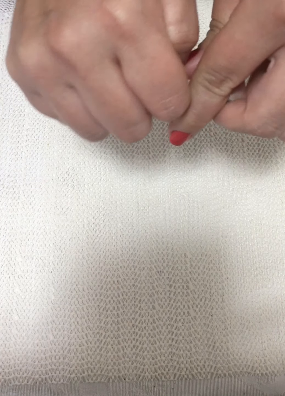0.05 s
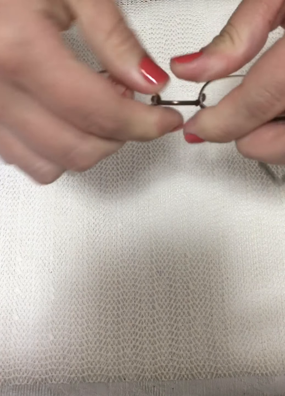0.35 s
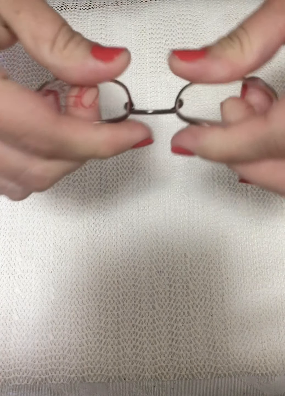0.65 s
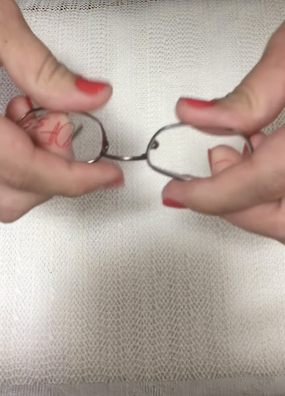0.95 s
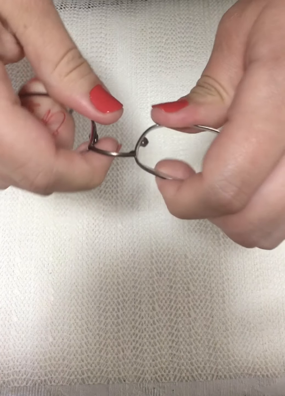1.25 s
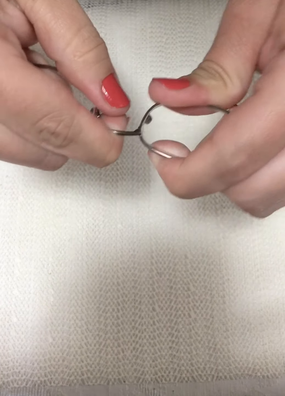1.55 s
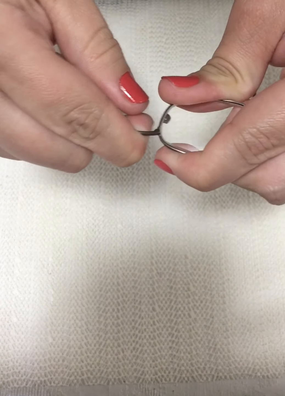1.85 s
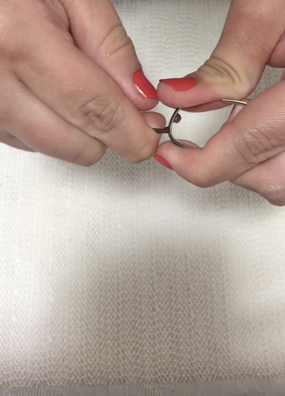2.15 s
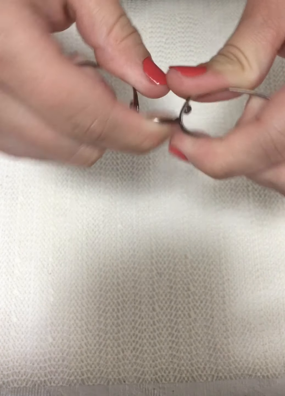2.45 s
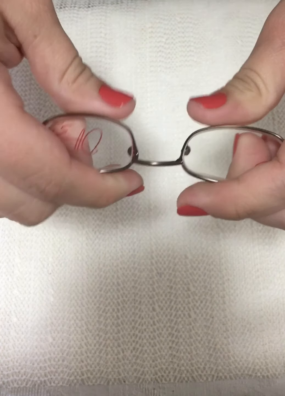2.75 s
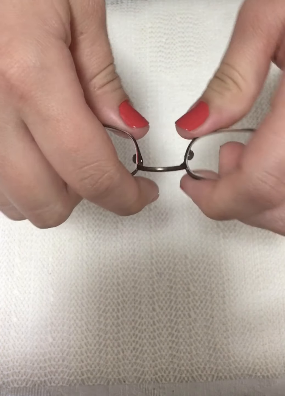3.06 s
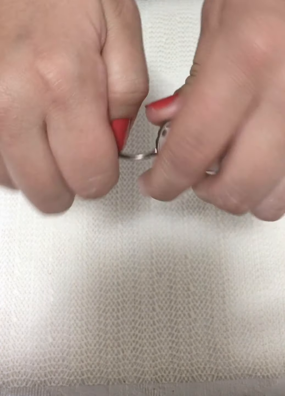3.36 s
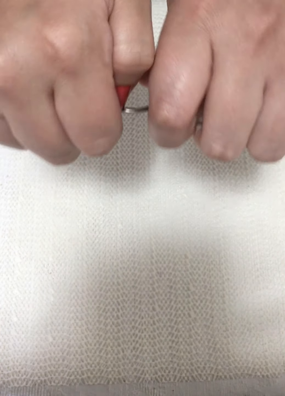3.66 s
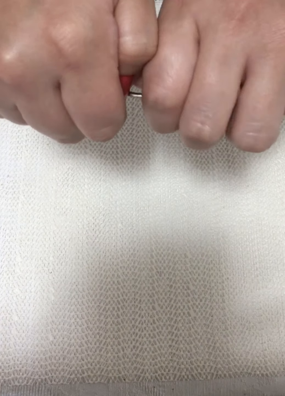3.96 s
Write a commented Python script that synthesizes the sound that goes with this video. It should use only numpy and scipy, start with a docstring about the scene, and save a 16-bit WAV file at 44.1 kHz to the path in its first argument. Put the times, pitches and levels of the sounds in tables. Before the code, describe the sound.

A few sharp, dry clicks of eyeglasses turned in the fingers in a quiet room.

```python
"""A low ventilation rumble with a faint hum and hiss runs from start to end. At once, metal eyeglasses
are turned over above a cloth, close by: fingers rub, and hinges, arms and fingernails give three dry
ticks that briefly ring the frame. Through the first second something hard is knocked a few times farther
off, heard mostly through the room. A soft rub follows, then a few weaker ticks from 2.2 s, one sharp
tick near 3.5 s, and a last faint rub and tick."""
import sys
import numpy as np
from scipy import signal
from scipy.fft import rfft, irfft
from scipy.io import wavfile
from scipy.ndimage import uniform_filter1d

SR = 44100
rng = np.random.default_rng(int(sys.argv[2]) if len(sys.argv) > 2 else 0)


def log_audio(samples):
    """Write samples as a 16-bit WAV file to the path given in sys.argv[1]."""
    # one column per channel
    frames = np.atleast_2d(samples).T
    # limit to full scale, then quantise
    limited = np.clip(frames, -1, 1)
    pcm = np.round(limited * 32767).astype(np.int16)
    wavfile.write(sys.argv[1], SR, pcm)


N = 176400
T = np.arange(N) / SR
FREQS = np.maximum(np.fft.rfftfreq(N, 1 / SR), 1)


def from_db(db):
    """Turn decibels into a number to multiply by."""
    return 10 ** (np.asarray(db) / 20)


def at_hz(points, hz):
    """Read between the (frequency, value) points of a table, with octaves evenly spaced."""
    f, v = np.transpose(points)
    return np.interp(np.log(hz), np.log(f), v)


def noise(gain):
    """Noise shaped by a gain at each frequency, then brought to an average power of 1."""
    x = irfft(rfft(rng.standard_normal(N)) * gain, N)
    return x / np.sqrt(np.mean(x ** 2) + 1e-20)


def narrow_noise(hz, width):
    """Noise gathered around one pitch: a wavering tone."""
    return noise(1 / (1 + ((FREQS - hz) / width) ** 2) ** 2)


def steady(x):
    """Even out slow swings of level."""
    return x / np.sqrt(uniform_filter1d(x ** 2, size=8000) + 1e-20)


def fade(start, t60):
    """Jump to 1 at the start, then die away; t60, the fade time, is how long a 60 dB drop takes."""
    first, last = np.searchsorted(T, [start, start + 1.5 * t60])
    out = np.zeros(N)
    out[first:last] = np.exp(-np.log(1000) * (T[first:last] - start) / t60)
    return out


# tone of the rumble and hiss: f/Hz, relative level/dB
AIR_COLOUR = [(20, -23.5), (45, -5.5), (70, -2), (100, -10.5), (150, -11.5), (200, -12.5), (250, -13.5),
              (350, -23), (600, -23.5), (900, -28.5), (1400, -38), (2500, -41), (4500, -48), (6300, -46),
              (7500, -50), (9400, -49.5), (12000, -53.5), (15500, -58.5)]
# the lower and the upper hum: f/Hz, width/Hz, level/dB
HUMS = [(82.8, 10, -53), (123.1, 10, -58.5)]
# outline of the lower hum's wavering: t/s, relative level/dB
HUM_WAVER = [(0.0, -55), (0.41, -50.5), (0.93, -52.5), (0.98, -48.5), (1.11, -57), (2.04, -47.5),
             (2.07, -60), (2.7, -47), (3.06, -58.5), (3.79, -54), (3.94, -44.5), (4.0, -49)]

def ventilation():
    """The ventilation rumbles and hisses with two hums, the lower one swelling and sinking."""
    low, high = (from_db(db) * steady(narrow_noise(hz, width)) for hz, width, db in HUMS)
    outline = np.interp(T, *np.transpose(HUM_WAVER))
    waver = from_db(0.86 * (outline - outline.mean()))
    air = from_db(-53.5) * noise(from_db(at_hz(AIR_COLOUR, FREQS)))
    return low * waver + high + air


# low booms that come with the knocks: t/s, f/Hz, level/dB, swell time/s
BOOMS = [(0.007, 280, -43.5, 0.0053), (0.327, 73.7, -40, 0.026), (0.29, 138.8, -53, 0.09),
         (0.329, 199.4, -45.5, 0.029), (0.614, 50, -44, 0.029), (0.946, 77.7, -40.5, 0.025),
         (0.947, 35.8, -45, 0.074)]

def room_booms():
    """The room's own low notes swell and die away."""
    out = 0
    for start, hz, db, swell in BOOMS:
        age = np.maximum(T - start, 0)
        shape = age / swell * np.exp(1 - age / swell)
        out = out + from_db(db) * shape * np.sin(2 * np.pi * hz * age)
    return out


# notes of the knocked things: t/s, f/Hz, width/Hz, relative level/dB, fade time/s
KNOCK_RINGS = [(0.33, 950, 110, -44, 0.21), (0.329, 1230, 150, -43.5, 0.32), (0.33, 1394, 60, -50, .37),
               (0.33, 1755, 90, -49, .23), (0.327, 3460, 200, -52, 0.2), (0.33, 9530, 110, -63, .31),
               (0.33, 11000, 160, -68, .28), (0.327, 15150, 200, -71, 0.23), (0.622, 1147, 60, -51, .28),
               (0.622, 1227, 60, -50, 0.3), (0.621, 1720, 190, -39.5, 0.21), (0.621, 2233, 90, -47, 0.27),
               (0.622, 3280, 180, -51.5, .3), (0.632, 10300, 130, -56.5, .28),
               (0.637, 10620, 220, -52, 0.25), (0.637, 10930, 150, -57.5, .24),
               (0.625, 12800, 130, -55.5, .26), (0.625, 13400, 130, -64, .22), (0.625, 14550, 180, -62, .2),
               (0.922, 3420, 1200, -54.5, 0.25)]

def knock_rings(rise_s=0.0068, gain_db=1):
    """The knocked things ring on, their notes building up in the room."""
    out = 0
    for start, hz, width, db, t60 in KNOCK_RINGS:
        shape = np.clip((T - start) / rise_s, 0, 1) * fade(start, t60)
        out = out + from_db(db + gain_db) * shape * narrow_noise(hz, width)
    return out


# how long the room keeps sounding: f/Hz, fade time/s
ROOM_FADE = [(100, 1), (400, 0.41), (1500, 0.56), (3500, 0.48), (7000, 0.39), (13000, .27)]
# where the levels of each knock are set: f/Hz
KNOCK_BANDS = [125, 350, 900, 1800, 3500, 7000, 12500]
# far knocks: t/s, rise time/s, fade time factor, share of early echoes (0-1),
# then level/dB per octave at each of KNOCK_BANDS
KNOCKS = [(0.009, 0.0031, 0.4, 0.71, -51, -50, -55.5, -55, -71, -97, -85),
          (0.288, 0.0084, 0.97, .45, -56, -74, -54.5, -47, -57, -52.5, -68),
          (0.326, 0.011, 0.97, 0.45, -40, -44, -44, -43.5, -53.5, -58, -64),
          (0.6135, 0.0022, 0.55, 0.8, -64, -59, -56, -68, -69, -59, -64),
          (0.620, 0.0055, 0.96, 0.51, -45.5, -47.5, -42, -37, -44.5, -47, -47),
          (0.923, 0.0066, 0.99, 0.4, -52.5, -67, -55, -50, -51, -54, -66)]

def distant_knocks(hold_s=0.0024, early_t60=0.058, treble_limit_hz=13600):
    """Far blows arrive as a rush of early echoes and a tail that dies sooner in the treble."""
    out = np.zeros(N)
    for hz in 100 * 2 ** (np.arange(16) / 2):  # half-octave bands
        band = noise(np.abs(np.log2(FREQS / hz)) < 1 / 4)
        power = 0
        for start, rise, length, share, *levels in KNOCKS:
            top_end = start + rise + hold_s  # the first echoes briefly hold the blow at its top
            attack = np.clip((T - start) / rise, 0, 1) * (T < top_end)
            early = share * fade(top_end, early_t60 * length)
            tail = (1 - share) * fade(top_end, at_hz(ROOM_FADE, hz) * length)
            gain = from_db(at_hz(list(zip(KNOCK_BANDS, levels)), hz))
            power = power + (gain * (attack + early + tail)) ** 2
        out += band * np.sqrt(power / 2)
    dull = 1 / np.sqrt(1 + (FREQS / treble_limit_hz) ** 20)
    return irfft(rfft(out) * dull, N)


# tone of the rubbing: f/Hz, relative level/dB
RUB_COLOUR = [(300, 15), (900, 3.5), (2500, 2), (4200, -2.5), (5000, -29), (12000, -28)]
# fingers sliding on the frame: t/s, length/s, relative level/dB
RUBS = [(0.0, 0.1, -66.5), (0.087, 0.18, -66.5), (0.223, 0.071, -66), (1.077, 0.063, -63.5),
        (1.12, 0.096, -73), (3.82, 0.042, -80)]

def finger_rubs(grain_db=5.5, grain_hz=200):
    """Skin drags on metal in short, grainy swells."""
    swell = 0
    for start, length, db in RUBS:
        arch = np.sin(np.pi * np.clip((T - start) / length, 0, 1))
        swell = swell + from_db(db) * np.sqrt(np.maximum(arch, 0))
    grain = from_db(grain_db * noise(1 / (1 + (FREQS / grain_hz) ** 2)))
    return swell * grain * noise(from_db(at_hz(RUB_COLOUR, FREQS)))


# tone of the room's answer to a tick: f/Hz, relative level/dB
TAIL_COLOUR = [(600, -17), (2000, 1), (3200, -1), (4600, -7), (5400, -7.5), (6300, 2.5), (7200, -5),
               (8500, -2.5), (9550, 4.5), (10400, -6), (12200, -12), (15500, -30)]

def room_tail(tick_time, colour, pitch):
    """The walls scatter a tick into a quick wash of echoes and a faint, longer tail."""
    start = tick_time + 0.001
    shape = 0.72 * fade(start, t60=0.11) + 0.28 * fade(start, t60=0.43)
    wash = noise(from_db(at_hz(TAIL_COLOUR, FREQS / pitch) + at_hz(colour, FREQS)))
    return from_db(-24.5) * wash * shape / (np.linalg.norm(shape) + 1e-9)


# notes of a free arm of the glasses: f/Hz, width/Hz, relative level/dB, fade time/s
ARM_NOTES = [(5830, 700, -51, 0.18), (8200, 900, -61.5, 0.19), (11600, 470, -69, .13),
             (14400, 500, -70, .11)]

def arm_ring():
    """An arm sings on after each of the TICKS below, only faintly when the fingers hold it."""
    out = 0
    for hz, width, note_db, t60 in ARM_NOTES:
        level = sum(from_db(db + arm_db) * fade(start, t60) for start, db, _, _, arm_db, *_ in TICKS)
        out = out + from_db(note_db) * level * narrow_noise(hz, width)
    return out


def contact(chatter, delay_s=0.00058, t60=0.0056):
    """Hard parts meet: one sharp push, then a tiny rattle (chatter); their energies add up to 1."""
    age = T[:2048]
    push = rng.standard_normal(len(age)) * (age > delay_s) * np.exp(-np.log(1000) * age / t60)
    push *= chatter / np.linalg.norm(push)
    push[0] += np.sqrt(max(1 - chatter ** 2, 0))
    return push


def resonate(x, hz, width):
    """Let x ring at one pitch; the greater the width, the shorter the ring."""
    r = np.exp(-np.pi * width / SR)
    feedback = [1, -2 * r * np.cos(2 * np.pi * hz / SR), r * r]
    return signal.lfilter(np.array([1, 0, -1]) * (1 - r * r) / 2, feedback, x + 1e-18)


# notes of the frame and lenses, muffled by the fingers: f/Hz, width/Hz, relative level/dB
FRAME_NOTES = [(950, 660, -14), (1884, 150, 3.5), (2260, 180, -5.5), (3224, 140, 1.5), (3850, 190, -4),
               (4630, 650, -11.5), (5460, 360, -2), (6200, 335, 2.5), (7600, 750, -2), (9560, 1220, 3.5),
               (11830, 930, 1), (12700, 2100, -10.5), (14200, 540, -23)]

def frame_ring(push, colour, pitch, damping):
    """A push makes the frame ring briefly; the grip shifts its notes and sets how fast they die."""
    return sum((-1) ** k * from_db(db + at_hz(colour, hz)) * resonate(push, hz * pitch, width * damping)
               for k, (hz, width, db) in enumerate(FRAME_NOTES))


# where the tone of each tick is set: f/Hz
TICK_BANDS = [2000, 4300, 6200, 9700, 13000]
# ticks of the glasses: t/s, relative level/dB, chatter (0-1), room boost/dB, arm ring boost/dB,
# the grip's pitch factor and damping factor, then boost/dB at each of TICK_BANDS
TICKS = [(0.0712, -4, 0.24, 0, 2, 0.98, 1.07, -1, -3, -0.82, -5, 8),
         (0.1563, -5.5, 0.4, 1, 4, 0.96, 0.92, -1.5, 4, -1.1, 0.5, 11.5),
         (0.2379, -18, 1, 6, 5, 0.973, 1.2, 6, 3.5, 0.5, -5, 2),
         (2.2067, -18.5, 0.69, 2, -18, 0.944, 1.14, -13, 6, -1.4, -4, 1),
         (2.4836, -31.5, 0.43, 13.5, -12, 0.96, 1.2, 8.5, 7.5, -1.2, -10, -18),
         (2.5892, -39, .7, 3, -12, 1.2, 1.8, -3, 2, 0, -6, -3),
         (2.6097, -34.5, 0.82, 2, -12, 1.09, 1.6, -3, 1, -0.81, -7.5, -14),
         (2.6810, -40, 0.64, -3, -12, 1.26, 1.8, -15, 11, -1, -7, -5),
         (3.4585, -0.5, 0.2, -4, -32, 0.99, 0.93, -19, -6, -0.47, -3.5, -1),
         (3.9380, -45, .7, 2, -12, 1.2, 1.6, 9, 6, 0, -13, -4)]

def frame_ticks(echo_delay_s=0.02, echo_db=-27):
    """Each contact rings the frame with a tone of its own, echoes once and wakes the room a little."""
    out = 0
    for start, db, chatter, room_db, _, pitch, damping, *band_db in TICKS:
        colour = list(zip(TICK_BANDS, band_db))
        click = frame_ring(contact(chatter), colour, pitch, damping)
        direct, echo = (np.pad(click, (int(t * SR), N))[:N] for t in (start, start + echo_delay_s))
        room = from_db(echo_db) * echo + room_tail(start, colour, pitch)
        out = out + from_db(db) * (direct + from_db(room_db) * room)
    return out


def scene():
    """The near glasses, the far knocks and the ventilation, added into one channel."""
    glasses = frame_ticks() + arm_ring() + finger_rubs()
    knocking = distant_knocks() + knock_rings() + room_booms()
    return (glasses + knocking + ventilation())[None]


def record(dry):
    """Cut the highest treble steeply, above 16300 Hz."""
    return signal.sosfilt(signal.ellip(10, .1, 70, 16300, fs=SR, output="sos"), dry)


dry = scene()
out = record(dry)
log_audio(out)
```